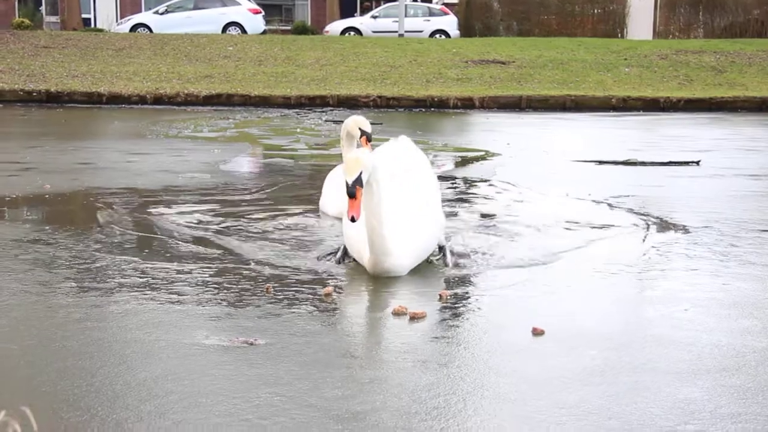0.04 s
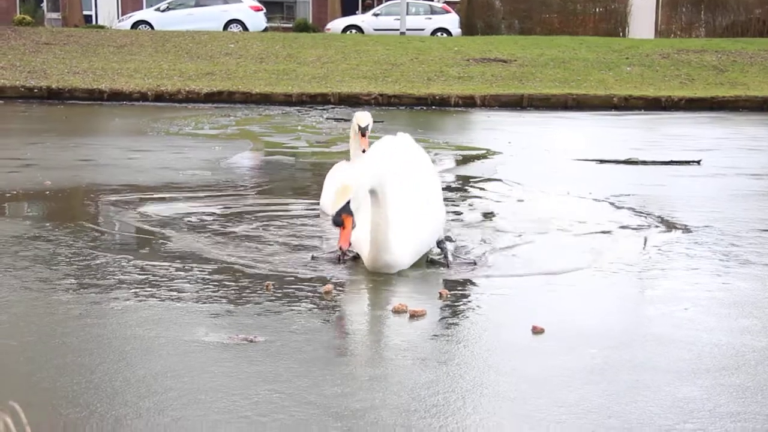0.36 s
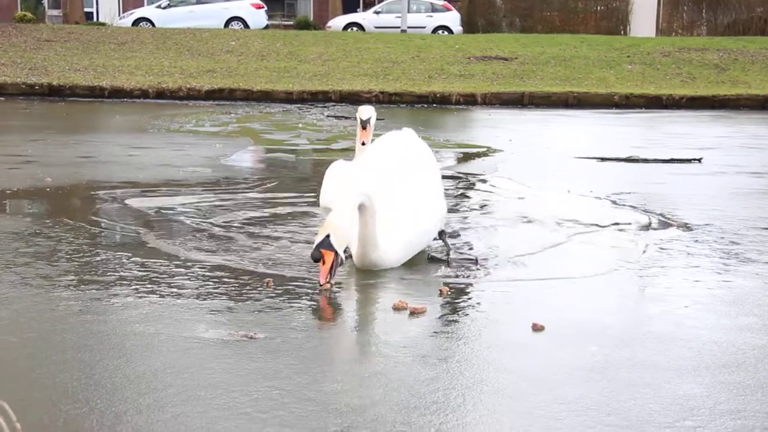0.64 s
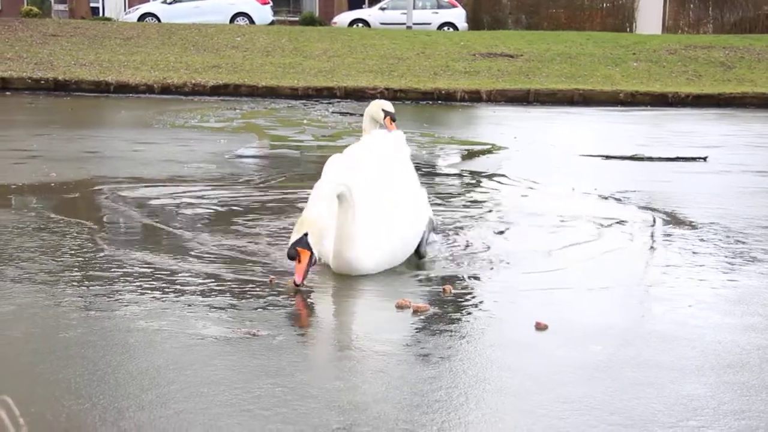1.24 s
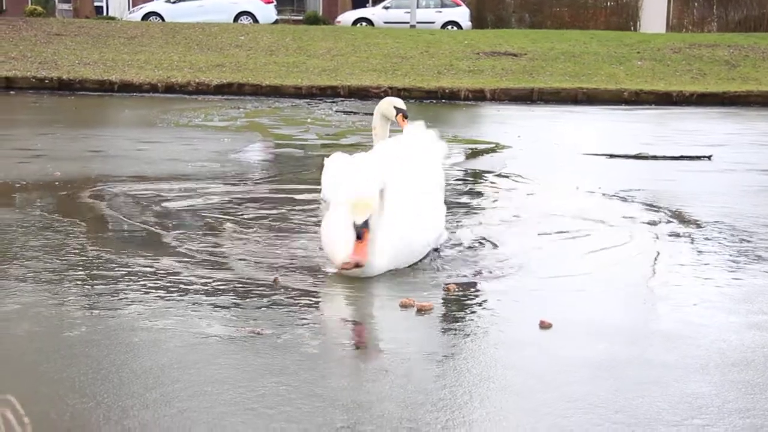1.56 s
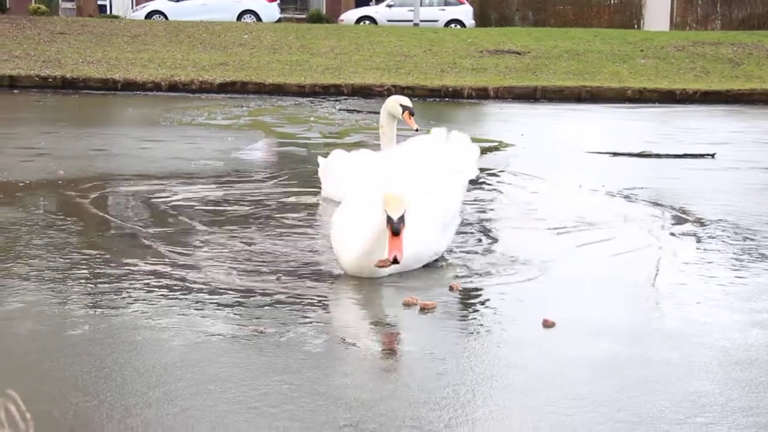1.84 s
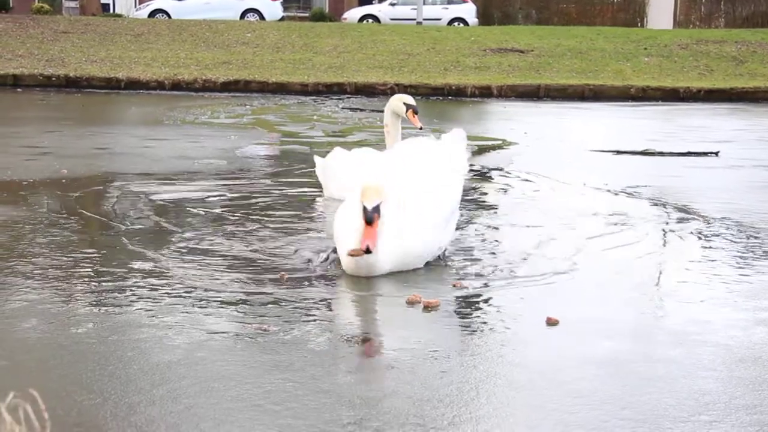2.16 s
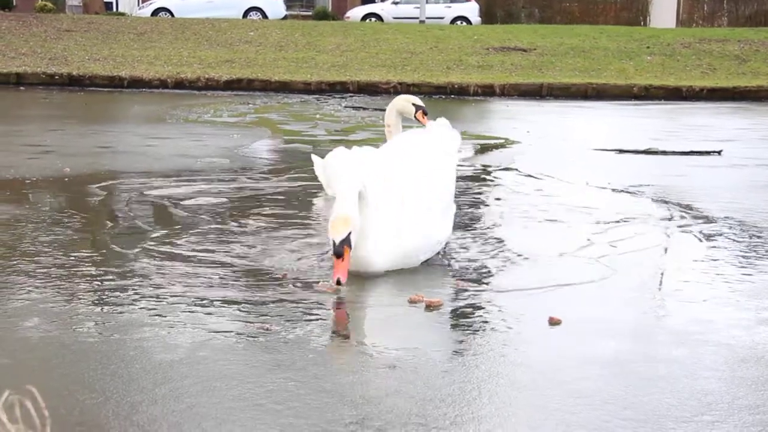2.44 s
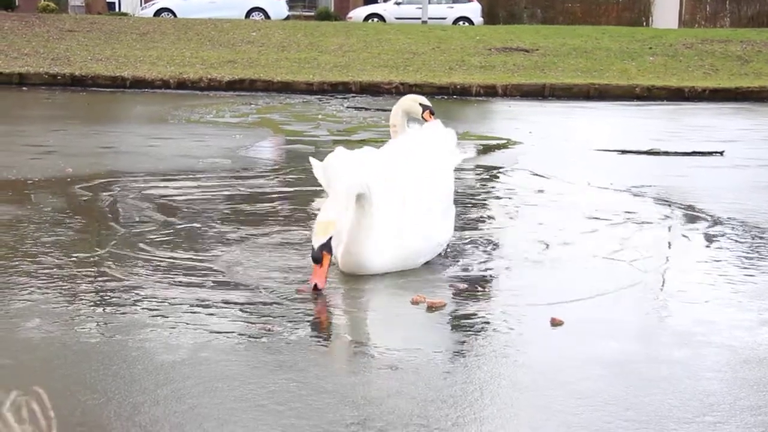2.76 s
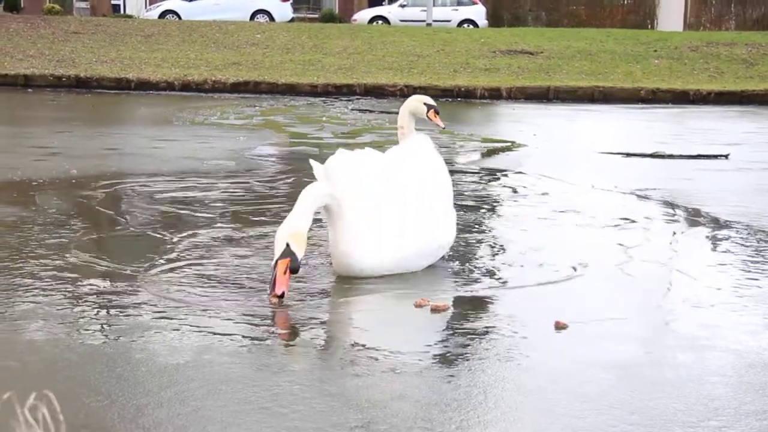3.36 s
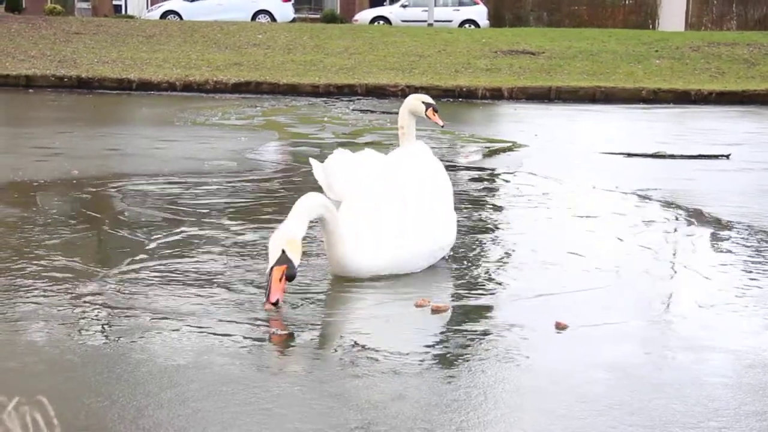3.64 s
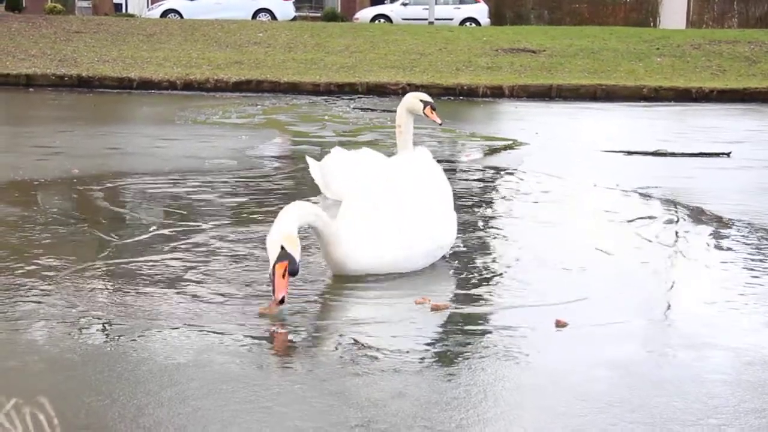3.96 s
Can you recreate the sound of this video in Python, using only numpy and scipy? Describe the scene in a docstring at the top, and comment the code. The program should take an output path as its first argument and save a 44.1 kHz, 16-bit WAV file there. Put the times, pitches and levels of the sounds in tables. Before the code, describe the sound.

Thin ice cracks and clicks as a swan pushes across a frozen pond, with faint fizzing, small sloshes and drips. The cracks peak midway, then thin out as wind thumps harder on the microphone over a steady hiss.

```python
"""A swan breaking thin pond ice

Each crack runs through the sheet as a bending wave, treble first, and arrives as a tiny falling chirp.
Small cracks fizz, and bubbles ring where water sloshes at the broken edge. Gusts buffet the microphone,
and the camera's gain control ducks the whole sound, hiss included, after the strongest peaks."""
import sys
import numpy as np
from scipy import signal
from scipy.fft import rfft, irfft
from scipy.io import wavfile
from scipy.ndimage import uniform_filter1d

SR = 44100
rng = np.random.default_rng(int(sys.argv[2]) if len(sys.argv) > 2 else 0)


def bounce(signal):
    """Save signal as a 16-bit WAV file at the path given by the first command-line argument."""
    frames = np.transpose(np.atleast_2d(signal))
    limited = np.clip(frames, -1, 1)
    pcm = np.round(limited * 32767).astype(np.int16)
    wavfile.write(sys.argv[1], SR, pcm)


N = 176400
TIME = np.arange(N) / SR
ICE_HZ = 3491  # the pitch at which the sheet radiates best


def amp(db):
    """Amplitude ratio for a level in decibels."""
    return 10 ** (np.asarray(db) / 20)


def unit(x):
    """Normalisation to an rms of 1."""
    return x / np.sqrt(np.mean(x ** 2) + 1e-20)


def add(mix, start, sound):
    """Superposition of a sound on the mix, from a start in seconds."""
    at = round(start * SR)
    part = mix[max(at, 0):max(at + len(sound), 0)]
    part += sound[max(-at, 0):][:len(part)]


def curve(points):
    """Linear interpolation of a control through time."""
    return np.interp(TIME, *np.transpose(points))


def shaped(x, points):
    """Filtering by a gain curve in dB, interpolated over log frequency."""
    hz, db = np.transpose(points)
    f = np.fft.rfftfreq(len(x), 1 / SR)
    return irfft(rfft(x) * amp(np.interp(np.log(f + 1), np.log(hz), db)), len(x))


def colour(x, points):
    """Spectral shaping at an rms of 1."""
    return unit(shaped(x, points))


def hiss():
    """Noise floor: broadband outdoor air and microphone hiss, plus the camera's thin pure-tone whine."""
    # Spectrum of the noise floor. Each row: frequency in Hz, gain in dB.
    air_spectrum = [(100, -8), (300, 5), (600, -2), (1100, -3), (1700, -9), (2600, -13.5), (4000, -20.5),
                    (6500, -24.5), (10000, -28), (15500, -27), (16500, -35)]
    air_db, whine_db, whine_hz = -44.5, -60.5, 15627
    air = amp(air_db) * colour(rng.standard_normal(N), air_spectrum)
    return air + amp(whine_db) * np.sin(2 * np.pi * whine_hz * TIME)


def wind():
    """Turbulence makes a lumpy rumble whose spectrum brightens as the wind rises."""
    # Strength of the rumble. Each row: time in seconds, level in dB.
    levels = [(0, -31), (.4, -35.5), (.6, -25.5), (.9, -37.5), (1.15, -34.5), (1.4, -29), (1.68, -31),
              (1.82, -22), (1.96, -25), (2.15, -26.5), (2.45, -29.5), (2.8, -31), (3.0, -28), (3.25, -13.5),
              (3.42, -18.5), (3.58, -19), (3.8, -18.5), (3.96, -10), (4, -18)]
    # Spectra of light and of strong wind. Each row: frequency in Hz, gain in dB.
    calm_spectrum = [(15, -16), (28, 0), (60, 2.5), (120, 0), (250, -12), (500, -21), (1000, -50),
                     (3000, -79)]
    gusty_spectrum = [(15, -27), (28, -12), (90, 5), (250, -7), (450, -15), (850, -31), (1500, -45.5),
                      (4000, -72)]
    gusty_from_db, gusty_range_db, lump_db, lump_s = -29.5, 10.5, 2, 0.014
    db = curve(levels)
    gusty_share = np.clip((db - gusty_from_db) / gusty_range_db, 0, 1)
    calm_noise, gusty_noise, lump_noise = rng.standard_normal((3, N))
    lumps = unit(signal.fftconvolve(lump_noise, np.hanning(int(2 * lump_s * SR)), "same"))
    calm = np.sqrt(1 - gusty_share) * colour(calm_noise, calm_spectrum)
    gusty = np.sqrt(gusty_share) * colour(gusty_noise, gusty_spectrum)
    return amp(db + lump_db * lumps) * (calm + gusty)


def eddy(t, half_width, band):
    """Pressure of a passing eddy: a few uneven swings under a bell-shaped envelope, at peak 1."""
    swirl = signal.hilbert(irfft(rfft(rng.standard_normal(len(t))) * band))
    levelled = swirl.real / np.sqrt(uniform_filter1d(abs(swirl) ** 2, size=500))
    pressure = levelled / np.cosh(np.minimum(abs(t) / half_width * 1.57, 50))
    return pressure / abs(pressure).max()


def buffets(size=8192):
    """Pressure fluctuations: each eddy thumps the microphone, and the hard ones rasp audibly."""
    # Eddies. Each row: centre in seconds, half width in seconds, thump peak in dB, upper corner in Hz.
    eddies = [(.053, 0.0028, -22.5, 293), (0.105, 0.0085, -2, 263), (0.468, .014, -20, 185),
              (0.508, 0.0056, -15.5, 250), (0.551, 0.0048, -13, 204), (0.601, 0.0031, -15.5, 355),
              (.653, 0.0046, -12, 185), (0.708, 0.011, -10, 148), (0.787, 0.0039, -17, 268),
              (0.812, 0.0032, -20, 217), (1.326, 0.011, -21.5, 130), (1.366, 0.01, -16.5, 120),
              (1.544, 0.019, -19, 163), (1.607, 0.011, -17, 223), (1.738, 0.0048, -15.5, 201),
              (1.796, .012, -9, 194), (1.830, 0.0043, -8.5, 232), (1.854, 0.005, -15, 200),
              (1.874, 0.0076, 5.5, 270), (1.8715, 0.0031, -6, 1030), (2.043, 0.014, -10.5, 149),
              (2.118, 0.0088, -2.5, 232), (2.174, 0.018, -15, 132), (2.231, 0.0087, -14, 139),
              (2.262, 0.0077, -5.5, 235), (2.295, 0.032, -17.5, 127), (2.508, 0.012, -18, 111),
              (2.598, 0.0055, -14.5, 187), (2.886, .007, -17.5, 159), (3.061, 0.011, 0.5, 176),
              (3.145, 0.0028, -2, 213), (3.172, 0.011, 7.5, 207), (3.296, 0.0061, 5.5, 270),
              (3.316, 0.001, -8, 600), (3.342, 0.01, -8.5, 350), (3.362, 0.0028, 1.5, 395),
              (3.386, 0.0044, -13, 500), (3.423, 0.011, 1.5, 363), (3.532, 0.012, -10.5, 333),
              (3.648, 0.0041, -4.5, 220), (3.691, 0.0067, -4, 404), (3.729, 0.0021, -2.5, 278),
              (3.761, 0.0086, -4, 230), (3.795, 0.0051, 0, 239), (3.81, 0.0044, -5.5, 380),
              (3.835, .010, 0.5, 333), (3.857, 0.0021, 2, 284), (3.903, 0.0019, -18, 600),
              (3.924, 0.0046, -2.5, 870), (3.932, 0.0081, 4.5, 290)]
    low_hz, rolloff_order = 74, 3.45
    rasp_hz, rasp_db, rasp_growth, rasp_width_share = 926, -26.5, 1.14, 0.57
    out = np.zeros(N)
    t = (np.arange(size) - size // 2) / SR
    f = np.fft.rfftfreq(size, 1 / SR)
    low_cut = f ** 2 / (f ** 2 + low_hz ** 2)
    rasp_band = 1 / (1 + (3.94 * (f / rasp_hz - 1)) ** 2)
    for centre, half_width, db, corner_hz in eddies:
        thump = eddy(t, half_width, low_cut / np.sqrt(1 + (f / corner_hz) ** (2 * rolloff_order)))
        rasp = eddy(t, rasp_width_share * half_width, rasp_band)
        add(out, centre - size // 2 / SR, amp(db) * thump + amp(rasp_db + rasp_growth * db) * rasp)
    return out


def bubble(hz, cycles, rise):
    """Bubble resonance: a damped tone whose pitch climbs by the fraction `rise` per decay time."""
    age = np.arange(0, 5 * cycles / hz, 1 / SR) * hz / cycles  # in decay times
    envelope = (1 - np.exp(-age * cycles)) * np.exp(-age)
    return envelope * np.sin(2 * np.pi * cycles * age * (1 + rise * age / 2))


def sloshes():
    """Clouds of resonating bubbles sum to sloshes and crunches at the broken edge."""
    # Sloshes. Each row: start in seconds, decay time in seconds, level in dB, treble gain in dB.
    bursts = [(1.193, 0.039, -41, 11), (1.22, 0.053, -36.5, -19), (1.279, .07, -46, -4),
              (1.368, 0.017, -28.5, -24), (1.377, 0.013, -24, -1), (1.382, 0.059, -41, -1),
              (1.391, 0.0065, -15.5, -7.5), (2.128, 0.069, -35, -16), (2.46, 0.091, -47, -11),
              (2.746, 0.17, -47.5, -27), (2.665, 0.0065, -31, -17), (2.669, 0.024, -34, -28),
              (2.99, 0.032, -37, -11), (3.445, .02, -44, -7), (3.621, 0.048, -39, -9)]
    # Spectrum of a cloud. Each row: frequency in Hz, gain in dB.
    spectrum = [(300, -2), (600, -4.5), (1200, 5.5), (2500, 1.5), (4000, 3.5), (5400, -9), (8000, -6.5),
                (11000, -13.5), (16000, -14.5)]
    bubbles_per_cycle, treble_hz = 0.07, 5500
    highpass = signal.butter(2, treble_hz, "high", fs=SR, output="sos")
    out, t = np.zeros(N), np.arange(SR // 5) / SR
    for start, decay, db, treble_db in bursts:
        cloud = 0
        for hz in np.geomspace(500, 14000, num=20):  # small bubbles are the most numerous
            births = rng.choice([-1, 1], len(t)) * (rng.random(len(t)) < bubbles_per_cycle * hz / SR)
            ringing = signal.fftconvolve(births, bubble(hz, cycles=5.6, rise=0.092))[:len(t)]
            cloud = cloud + np.sqrt(hz) * unit(ringing)
        cloud = colour(np.roll(cloud, len(t) // 2), spectrum)
        treble = signal.sosfiltfilt(highpass, cloud)
        envelope = np.minimum(t / (0.23 * decay), 1) * np.exp(-(t / decay) ** 2)
        add(out, start, amp(db) * envelope * (cloud + (amp(treble_db) - 1) * treble))
    return out


def drops():
    """A drip rings as one damped bubble; a droplet ticks as a brief burst of treble noise."""
    # Drips. Each row: start in seconds, initial pitch in Hz, level in dB.
    drips = [(0.142, 1600, -27), (1.972, 2520, -29), (1.991, 787, -20), (2.304, 1850, -26.5),
             (2.667, 3000, -30), (2.851, 2510, -34)]
    # Droplet ticks. Each row: start in seconds, level in dB.
    ticks = [(0.258, -37), (1.327, -40), (1.516, -33), (2.233, -29), (2.278, -36), (2.793, -35)]
    tick_hz, tick_decay_s = 7500, 0.0004
    highpass = signal.butter(2, tick_hz, "high", fs=SR, output="sos")
    out, t = np.zeros(N), np.arange(SR // 5) / SR
    for start, hz, db in drips:
        add(out, start, amp(db) * bubble(hz, cycles=3.8, rise=0.069))
    for start, db in ticks:
        burst = rng.standard_normal(len(t)) * np.exp(-t / tick_decay_s)
        add(out, start, amp(db) * signal.sosfilt(highpass, burst))
    return out


def chirp(travel, end_hz, top_hz=15400, swell=0.96, cutoff_s=0.00011):
    """Dispersion: treble bending waves arrive first, so the pitch falls as the tone swells, then stops."""
    t = np.arange(0, travel + 6 * cutoff_s, 1 / SR)
    progress = np.clip(t / travel, 1e-3, 1)
    pitch = np.minimum(end_hz / np.sqrt(1 - (1 - progress) ** 2), top_hz)
    envelope = np.sin(np.pi / 2 * progress) ** swell * np.exp(-np.maximum(t - travel, 0) / cutoff_s)
    return envelope * np.sin(2 * np.pi * np.cumsum(pitch) / SR)


def crackle(per_second=1500, spread_db=3):
    """Acoustic emission: the strained sheet fizzes with countless tiny chirps at random times."""
    # Strength of the fizz. Each row: time in seconds, level in dB.
    levels = [(0, -51), (.12, -45), (.25, -54), (.8, -56.5), (1.0, -49.5), (1.18, -47), (1.4, -40),
              (1.55, -39.5), (1.68, -52.5), (1.98, -45.5), (2.14, -37.5), (2.26, -44), (2.4, -51),
              (2.5, -46), (2.9, -46), (3.2, -47), (3.65, -46.5), (4, -48)]
    # Radiation of the ice from farther off. Each row: frequency in Hz, gain in dB.
    far_radiation = [(800, -13.5), (2300, 2.5), (3100, -9.5), (3600, -3.5), (4150, -2), (4700, -3.5),
                     (5400, -5.5), (7000, -6), (15000, -6)]
    out, kinds = np.zeros(N), rng.random((24, 2))
    for travel_draw, pitch_draw in kinds:
        onsets = rng.random(N) < per_second / len(kinds) / SR
        strengths = amp(spread_db * np.minimum(rng.exponential(1, N), 4))
        wave = chirp(0.00114 + 0.00332 * travel_draw, ICE_HZ * (0.93 + 0.19 * pitch_draw))
        out += signal.oaconvolve(onsets * strengths, wave)[:N]
    return colour(out, far_radiation) * amp(curve(levels))


def sheet_scatter(t, centre_hz=3800):
    """Scattering in the sheet: an impulse response of two noise tails gathered around one pitch."""
    tails = 0
    for db, t60 in (-6.5, 0.031), (-28, 0.12):  # short ring, faint far tail
        tail = rng.standard_normal(len(t)) * amp(-60 * t / t60) * np.minimum(t / 0.0015, 1)
        tails = tails + amp(db) * tail / np.linalg.norm(tail)
    return signal.lfilter(*signal.iirpeak(centre_hz, Q=0.55, fs=SR), tails)


def cracks():
    """Bending waves outrun sound in air: each crack is a chirp, ended by the direct airborne snap."""
    # Cracks. Each row: start in seconds, level in dB, travel time in seconds.
    fractures = [(0.016, -27, .0035), (0.052, -29.5, .003), (.1130, -21, .0035), (.1200, -18.5, .004),
                 (.1290, -27.5, .003), (0.254, -34, .002), (0.3836, -36, .003), (0.4043, -32.5, .003),
                 (0.473, -34, .003), (0.57, -33, .003), (0.6977, -32, .003), (0.7229, -33.5, .002),
                 (0.7447, -39.5, 0.0018), (0.977, -33, .003), (1.0550, -12.5, .0035), (1.0995, -37, .003),
                 (1.2775, -20.5, .003), (1.3080, -25, .0035), (1.3095, -18, .003), (1.3860, -23, .003),
                 (1.462, -7, .0037), (1.4652, -20, .0034), (1.4790, -12.5, .0033), (1.5280, -12.5, .0032),
                 (1.9009, -20.5, .003), (1.904, -19, .003), (1.926, -26, .003), (2.0410, -11, .0043),
                 (2.0447, -14.5, .0035), (2.0717, -24, .003), (2.1817, -10, .0032), (2.476, -28, .0035),
                 (2.5374, -31.5, .003), (2.69, -32.5, .003), (3.9208, -22, .0035), (3.9753, -29.5, .003)]
    # Radiation of the ice. Each row: frequency in Hz, gain in dB.
    radiation = [(500, -3), (1500, -3), (2600, 4), (3300, -3), (3700, 1.5), (4400, -0.5), (5200, -1),
                 (7000, 0), (10000, -1.5), (16000, -16)]
    snap_db, snap_decay_s = -10, 0.00042
    out, t = np.zeros(N), np.arange(SR // 2) / SR
    for start, db, travel in fractures:
        add(out, start, amp(db) * chirp(travel, ICE_HZ))
        snap = np.exp(-t / snap_decay_s) * rng.standard_normal(len(t))
        add(out, start + travel, amp(db + snap_db) * snap)
    direct = shaped(out, radiation)
    return direct + signal.fftconvolve(direct, sheet_scatter(t))[:N]


def scene():
    """Superposition of ice, water and wind at one microphone."""
    return (cracks() + crackle() + sloshes() + drops() + buffets() + wind() + hiss())[None]


def record(dry):
    """Automatic gain control ducks quickly and recovers slowly; clipping and a band limit follow."""
    threshold_db, duck_share, attack_s, recovery_db_per_s = -5, 0.86, 0.01, 35
    band_edge_hz = 16050
    excess_db = np.maximum(20 * np.log10(abs(dry[0]) + 1e-9) - threshold_db, 0)
    recovery_db = TIME * recovery_db_per_s
    held_db = np.maximum.accumulate(excess_db + recovery_db) - recovery_db  # peaks sink at a steady rate
    pole = np.exp(-1 / (attack_s * SR))
    smoothed_db = signal.lfilter([1 - pole], [1, -pole], held_db)
    clipped = np.clip(dry * amp(-duck_share * smoothed_db), -1, 1)
    padded = np.pad(clipped, ((0, 0), (255, 255)), "reflect", reflect_type="odd")
    lowpass = signal.firwin(511, band_edge_hz, window=("kaiser", 9), fs=SR)
    return signal.oaconvolve(padded, lowpass[None], "valid")


dry = scene()
out = record(dry)
bounce(out)
```